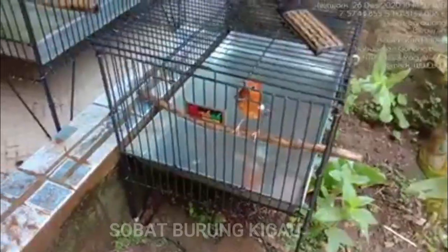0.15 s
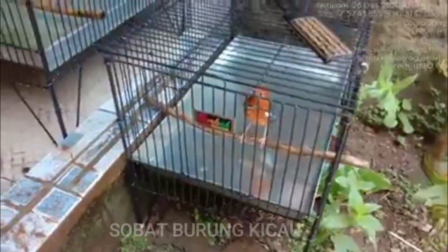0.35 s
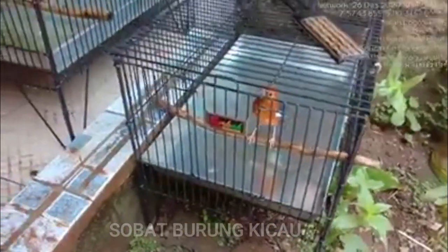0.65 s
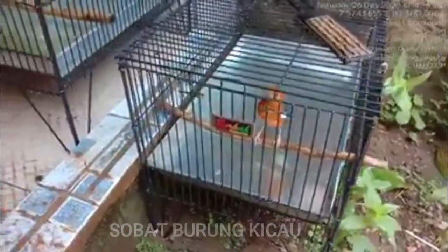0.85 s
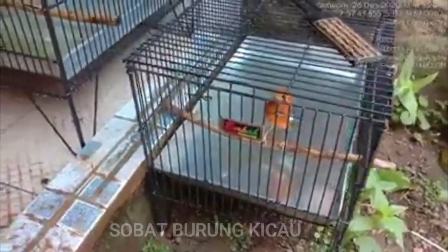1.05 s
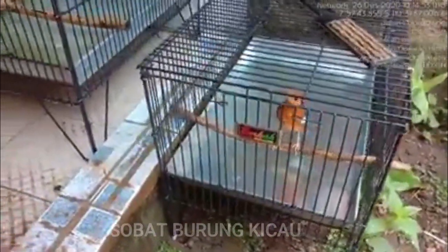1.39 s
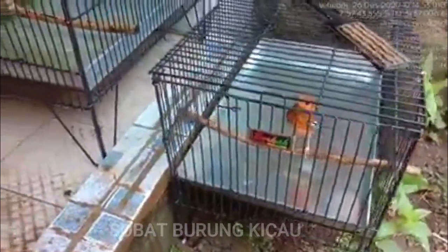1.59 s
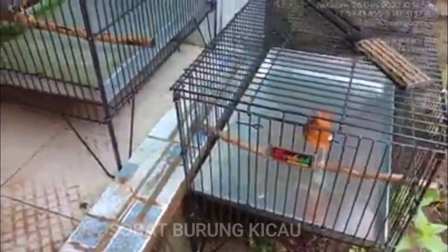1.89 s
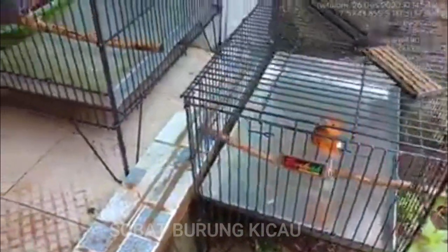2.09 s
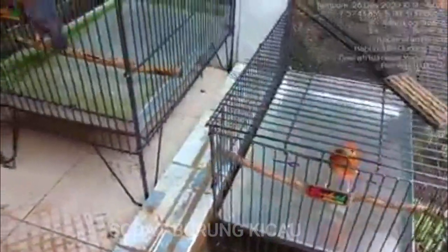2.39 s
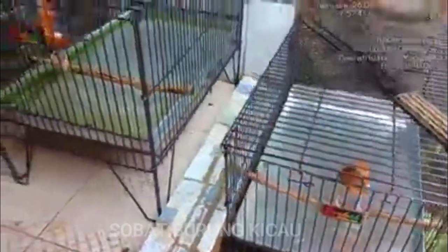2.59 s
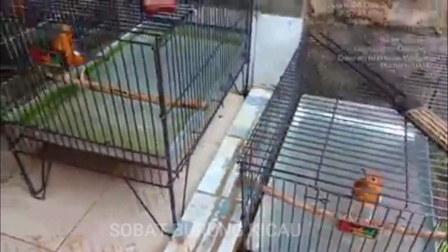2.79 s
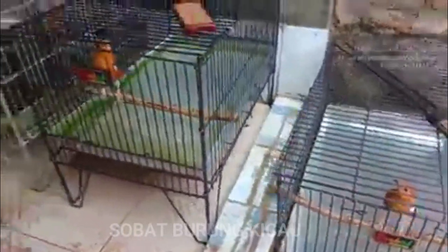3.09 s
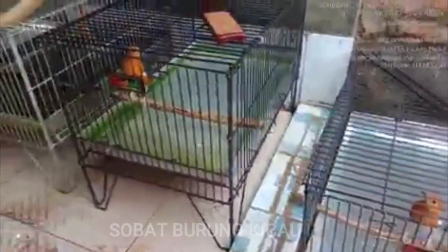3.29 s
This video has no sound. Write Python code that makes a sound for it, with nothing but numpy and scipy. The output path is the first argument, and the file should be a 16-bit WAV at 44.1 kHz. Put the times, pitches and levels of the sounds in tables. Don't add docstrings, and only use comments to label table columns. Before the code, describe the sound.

A caged songbird close to the microphone fires a quick run of five harsh high chirps, then one softer falling whistle; fainter birds whistle lower from farther off in a ringing tiled yard over low traffic rumble.

```python
import sys
import numpy as np
from scipy import signal
from scipy.fft import rfft, irfft
from scipy.io import wavfile
from scipy.ndimage import uniform_filter1d

SR = 44100
rng = np.random.default_rng(int(sys.argv[2]) if len(sys.argv) > 2 else 0)


def dump_mix(stems):
    frames = np.atleast_2d(stems).T
    limited = np.clip(frames, -1, 1)
    pcm = np.round(limited * 32767).astype(np.int16)
    wavfile.write(sys.argv[1], SR, pcm)


def linear_from_db(decibels):
    return 10 ** (np.asarray(decibels, float) / 20)


N = 152145

# pitch_hz [Hz], density_db [dB per Hz]
RUMBLE_SPECTRUM = [(20, -37), (45, -1), (92, -2), (174, -7.5), (270, -7.5), (495, -13.5), (1000, -27.5),
                   (1600, -33.5)]
# start_s [s], level_db [dB]
BACKGROUND_SWELL = [(0, -53.5), (.2, -54), (.8, -60), (1.25, -61.5), (1.4, -59), (1.75, -52), (3.45, -50)]
# pitch_hz [Hz], share [0-1]
SWELL_SHARE = [(60, 0.71), (250, 0.76), (700, 0.92), (1600, 0.7), (5000, 0.55), (12000, 0.5)]
# pitch_hz [Hz], width_hz [Hz], level_db [dB]
MOTOR_HUM = [(59.4, 18, -51.5), (96.5, 40, -53.5), (199, 17, -62), (235, 16, -68.5)]
# pitch_hz [Hz], density_db [dB per Hz]
HISS_SPECTRUM = [(1200, -8), (1900, -4), (2500, -2), (4000, -6.5), (7000, -7.5), (9500, -8.5),
                 (12000, -4.5), (14500, -8.5)]
# pitch_hz [Hz], likeness [0-1]
LIKENESS = [(30, 1), (150, 0.96), (400, 0.9), (800, 0.66), (3000, 0.15), (12000, 0.12)]
RUMBLE_DB, HISS_DB = -47, -70.5

# start_s [s], pitch_hz [Hz], level_db [dB]
CHIRPS_UPPER = [
    [(.157, 4367, -55), (.176, 4950, -30), (.2, 4550, -41), (.225, 4400, -40), (.25, 4220, -43.5),
     (.28, 4450, -42), (.302, 4900, -38), (.32, 4750, -44), (.352, 4720, -42)],
    [(.397, 5400, -52), (.41, 5330, -41), (.427, 5150, -33), (.445, 4950, -40.5), (.475, 4550, -45)],
    [(.535, 5250, -50), (.552, 5430, -29.5), (.578, 5480, -31), (.59, 5440, -53), (.6, 5450, -45),
     (.61, 5450, -52), (.62, 5450, -31), (.635, 5450, -41)],
    [(.66, 5100, -51), (.684, 5350, -37.5), (.695, 5330, -46), (.705, 5320, -42.5), (.725, 5300, -48.5),
     (.76, 5280, -51.5)],
]
# start_s [s], pitch_hz [Hz], level_db [dB]
HELD_NOTES = [
    [(.884, 3970, -50), (.902, 5853, -33.5), (.93, 5670, -42), (1, 5684, -39), (1.06, 5650, -40.5),
     (1.085, 5550, -52.5), (1.13, 5600, -59)],
    [(1.318, 3760, -64), (1.337, 3346, -48), (1.355, 3088, -46), (1.385, 2940, -42), (1.41, 2770, -48.5),
     (1.428, 2595, -43), (1.49, 2504, -46.5), (1.65, 2609, -43.5), (1.725, 2433, -45.5)],
]
# start_s [s], pitch_hz [Hz], level_db [dB]
CHIRPS_LOWER = [
    [(.156, 1950, -52), (.168, 2750, -45), (.19, 2660, -44), (.225, 2657, -58.5), (.255, 2700, -68),
     (.28, 2950, -53), (.3, 3290, -47), (.325, 3406, -53.5), (.35, 3650, -56)],
    [(.398, 3300, -56), (.415, 3800, -54), (.46, 4150, -62)],
    [(.535, 2590, -49), (.55, 3314, -59), (.585, 4100, -79)],
    [(.66, 3900, -63), (.69, 3960, -64), (.725, 3830, -91)],
    [(.884, 2793, -62.5), (.905, 4180, -54.5), (.93, 4260, -78)],
]
# upper_multiple [ratio], lower_multiple [ratio],
# level_db [dB to the lower voice]
MIXED_TONES = [(0, 1, 5), (0, 2, 5), (1, -1, -17.5), (1, 1, -1.5), (1, 2, -3.5), (2, -1, -8), (2, 1, -5),
               (2, 2, -10)]
NEAR_WOBBLE = [.007, .006, .006, .006, .009, .006]
# second_db [dB], third_db [dB], air_db [dB], puff_db [dB], left_right_db [dB]
NOTE_COLOUR = [
    (-6.5, 3.5, -35.5, -63, 2),
    (-14, -15, -47.5, -29.5, 1),
    (-10.5, -18, -51, -29, 0),
    (-3.5, -14, -46, -43, -1),
    (-6, -38, -90, -37.5, 0),
    (-41, -46, -63.5, -46.5, 0.3),
]
# pitch_hz [Hz], density_db [dB per Hz]
BREATH_SPECTRUM = [(1500, -31), (2200, -20), (3700, -15), (5200, -8), (7200, -16), (9500, -8),
                   (12500, -2.5), (14500, -4.5)]
# start_s [s], pitch_hz [Hz], level_db [dB]
WHISTLE_RASP = [(1.318, 5400, -64), (1.336, 4900, -51), (1.36, 4700, -57), (1.41, 4500, -66)]
# multiple [ratio], level_db [dB]
WHISTLE_PARTIALS = [(.52, -23), (.64, -24), (.8, -16), (1.13, -14)]
# pitch_hz [Hz], t60_s [s]
WALL_DECAY = [(1500, 0.74), (3000, 0.58), (6000, 0.47), (10000, 0.45), (14000, 0.29)]
EARLY_DB = -3.5

# start_s [s], length_s [s], from_hz [Hz], to_hz [Hz], level_db [dB]
FAR_TWITTER = [
    (0.735, 0.046, 2980, 2840, -63),
    (2.403, 0.073, 4600, 5900, -68.5),
    (2.52, .08, 5300, 6090, -66),
    (2.621, 0.084, 5600, 4350, -74.5),
    (3.046, 0.068, 10800, 11650, -69),
]
# start_s [s], pitch_hz [Hz], level_db [dB]
FAR_FIRST = [
    [(.82, 2416, -71.5), (.9, 2548, -68), (1.04, 2480, -71), (1.08, 2380, -69), (1.17, 2560, -68),
     (1.26, 2090, -70), (1.32, 2004, -62.5), (1.37, 1740, -60), (1.4, 1700, -69)],
    [(1.825, 2050, -63), (1.86, 2250, -63), (1.885, 2634, -59), (1.93, 2660, -60), (1.965, 2720, -67)],
    [(1.968, 3460, -64), (1.99, 3100, -64), (2.01, 2910, -55), (2.05, 2907, -52.5), (2.1, 2698, -55.5),
     (2.15, 2746, -55.5), (2.2, 2870, -48), (2.235, 2950, -50), (2.29, 2955, -68)],
    [(2.305, 3900, -77), (2.335, 3950, -61), (2.37, 3900, -61), (2.42, 3850, -65)],
]
# start_s [s], pitch_hz [Hz], level_db [dB]
FAR_LAST = [
    [(2.455, 2920, -63), (2.48, 3430, -64), (2.515, 2706, -61)],
    [(2.522, 2843, -54), (2.56, 2796, -56), (2.605, 2700, -53), (2.625, 2750, -66), (2.645, 2842, -52),
     (2.68, 2825, -53), (2.74, 2860, -70)],
    [(2.885, 2205, -67), (2.95, 2073, -61.5), (3.0, 1988, -62.5)],
    [(3.01, 2330, -62), (3.05, 2506, -59.5), (3.08, 2940, -53.5), (3.11, 3148, -58), (3.15, 3205, -65)],
    [(3.23, 2237, -62), (3.26, 2233, -60), (3.29, 2110, -65), (3.325, 1994, -63), (3.35, 1910, -68)],
]
# start_s [s], pitch_hz [Hz], level_db [dB]
FAR_HOARSE = [
    [(1.966, 3200, -67), (1.99, 3200, -62), (2.06, 3200, -66), (2.14, 3050, -74)],
    [(2.45, 3100, -72), (2.48, 3100, -66), (2.53, 3100, -72)],
]
# start_s [s], pitch_hz [Hz], level_db [dB]
ENGINE_DRONE = [(1.5, 215, -67), (1.8, 220, -62), (2.2, 220, -62.5), (2.45, 220, -71), (2.65, 220, -55),
                (2.9, 235, -59.5), (3.1, 256, -55.5), (3.3, 259.8, -63), (3.45, 261, -65)]


def evened(x):
    return x / np.sqrt(np.mean(x ** 2) + 1e-20)


def read(points, hz):
    f, value = np.transpose(points)
    return np.interp(np.log(hz + 1), np.log(f + 1), value)


def add(mix, start_s, sound):
    part = mix[..., round(start_s * SR):][..., :sound.shape[-1]]
    part += sound[..., :part.shape[-1]]


def drift(count, smooth_s):
    size = max(int(smooth_s * SR), 1)
    once = uniform_filter1d(rng.standard_normal(count), size)
    return evened(uniform_filter1d(once, size))


def background():
    frames, hz = N // 512 + 5, np.fft.rfftfreq(2048, 1 / SR)
    a, b, c, d, patches = rng.standard_normal((frames, 1025, 5)).T
    patches = evened(uniform_filter1d(uniform_filter1d(patches, 10, 0), 6, 1))

    s, level_db = np.transpose(BACKGROUND_SWELL)
    swing_db = np.interp(np.arange(frames) * 512 / SR, s, level_db) - level_db.max()
    beyond_octaves = np.log2(np.maximum(hz / RUMBLE_SPECTRUM[-1][0], 1))
    rumble = linear_from_db(read(RUMBLE_SPECTRUM, hz) - 20 * beyond_octaves)
    hiss = linear_from_db(read(HISS_SPECTRUM, hz))
    power = (rumble / np.linalg.norm(rumble) * linear_from_db(RUMBLE_DB))[:, None] ** 2
    power = power + (hiss / np.linalg.norm(hiss) * linear_from_db(HISS_DB))[:, None] ** 2
    power = power * linear_from_db(2 * read(SWELL_SHARE, hz)[:, None] * swing_db)
    for pitch_hz, width_hz, hum_db in MOTOR_HUM:
        peak = np.exp(-((hz - pitch_hz) / max(width_hz, 8)) ** 2)
        power = power + (peak / peak.sum() * linear_from_db(2 * hum_db))[:, None]

    same = np.clip(read(LIKENESS, hz), -1, 1)[:, None]
    left = a + 1j * b
    right = same * left + np.sqrt(1 - same ** 2) * (c + 1j * d)
    z = np.array([left, right]) * linear_from_db(1.03 * patches)
    unit = np.std(signal.istft(z[0], nperseg=2048, noverlap=1536)[1]) / np.sqrt(len(hz))
    return signal.istft(z * np.sqrt(power), nperseg=2048, noverlap=1536)[1][:, :N] / unit


def voice(curve, t, wobble):
    s, pitch_hz, level_db = np.transpose(curve)
    pitch = np.interp(t, s, pitch_hz)
    glide = abs(np.gradient(np.log2(pitch))) * SR
    wobble = wobble + np.minimum(0.0022 * glide, 0.06)
    turns = np.cumsum(pitch * (1 + wobble * drift(len(t), 0.00234))) / SR
    edges = np.clip(np.minimum((t - s[0]) / 0.004, (s[-1] - t) / 0.012), 0, 1)
    flutter_db = 3.2 * drift(len(t), 0.0025)
    return turns, np.sqrt(2) * edges * linear_from_db(np.interp(t, s, level_db) + flutter_db)


def note(curve, partials, wobble, lower=None):
    t = np.arange(curve[0][0], curve[-1][0], 1 / SR)
    turns, size = voice(curve, t, wobble)
    x = size * sum(linear_from_db(db) * np.sin(2 * np.pi * k * turns) for k, db in partials)
    if lower:
        low_turns, low_size = voice(lower, t, 1.31 * wobble)
        mixed = 0
        for k, m, db in MIXED_TONES:
            mixed = mixed + linear_from_db(db) * np.sin(2 * np.pi * (k * turns + m * low_turns))
        x = x + low_size * mixed
    return t[0], x


def air(curve, air_db, puff_db):
    puff_rise_s, puff_fall_s = 0.014, 0.031
    lumps_db, lump_hz = 3.5, 240
    u = np.arange(curve[0][0], curve[-1][0], 1 / SR) - curve[0][0]
    hiss = rfft(rng.standard_normal(len(u)))
    hiss = hiss * linear_from_db(read(BREATH_SPECTRUM, np.fft.rfftfreq(len(u), 1 / SR)))
    hiss = hiss * linear_from_db(lumps_db * drift(len(hiss), lump_hz * u[-1] / SR))
    shape = linear_from_db(air_db) + linear_from_db(puff_db) * np.exp(-u / puff_fall_s)
    edges = np.clip(np.minimum(u / puff_rise_s, (u[-1] - u) / 0.025), 0, 1)
    return evened(irfft(hiss, len(u))) * shape * edges


def near_bird():
    out = np.zeros((2, N))
    notes = zip(CHIRPS_UPPER + HELD_NOTES, CHIRPS_LOWER + [None], NEAR_WOBBLE, NOTE_COLOUR)
    for curve, lower, wobble, colour in notes:
        second_db, third_db, air_db, puff_db, left_right_db = colour
        start_s, x = note(curve, [(1, 0.0022), (2, second_db), (3, third_db)], wobble, lower)
        pan = linear_from_db(np.array([[0.5], [-0.5]]) * left_right_db)
        add(out, start_s, (x + air(curve, air_db, puff_db)) * pan)
    whistle = HELD_NOTES[-1]
    add(out, *note(WHISTLE_RASP, [(1, 1), (1.45, -11.5)], 0.14))
    add(out, *note(whistle, WHISTLE_PARTIALS, 0.034))
    add(out, *note(whistle, [(4, -27.5), (5, -22.0)], 0.05))
    return out


def yard(x, wet_db):
    taps = np.zeros((2, SR))
    at = np.arange(400, SR - 20, 20) + rng.integers(0, 20, (2, (SR - 401) // 20))
    np.put_along_axis(taps, at, rng.choice([-1., 1.], at.shape), 1)
    hz, t, z = signal.stft(taps, SR, nperseg=256)
    t60_s = np.maximum(read(WALL_DECAY, hz), 0.1)[:, None]
    tail = signal.istft(z * linear_from_db(-60 * t / t60_s), SR, nperseg=256)[1]
    tail = linear_from_db(wet_db) * tail / np.linalg.norm(tail[0])

    early = np.zeros_like(tail)
    bounce_at = rng.integers(40, 900, (2, 6))
    bounces = rng.choice([-1., 1.], (2, 6)) * linear_from_db(EARLY_DB) / np.sqrt(6)
    np.put_along_axis(early, bounce_at, bounces, 1)
    wet = signal.fftconvolve(x, tail + early, axes=1)[:, :N]
    return (x + wet) / np.sqrt(1 + linear_from_db(2 * wet_db) + linear_from_db(2 * EARLY_DB))


def far_birds():
    out = np.zeros(N)
    for start_s, length_s, from_hz, to_hz, level_db in FAR_TWITTER:
        bend_hz = 0.7 * from_hz + 0.3 * to_hz
        curve = [(start_s, from_hz, level_db - 7),
                 (start_s + 0.3 * length_s, bend_hz, level_db),
                 (start_s + length_s, to_hz, level_db)]
        add(out, *note(curve, [(1, 0.5), (2, -9)], 0.07))
    for curve in FAR_FIRST + FAR_LAST:
        add(out, *note(curve, [(1, 1), (4, -24)], 0.004))
    for curve in FAR_HOARSE:
        add(out, *note(curve, [(1, 0)], 0.09))
    rustle_span = [(2.3,), (2.4,)]
    add(out, rustle_span[0][0], air(rustle_span, air_db=-69, puff_db=-63))
    return out * linear_from_db(np.array([[1.], [-1.]]))


def passing_engine():
    out = np.zeros((2, N))
    add(out, *note(ENGINE_DRONE, [(1, 0), (1.5, -7.5)], 0.0303))
    return out


def scene():
    traffic = background()
    near = yard(near_bird(), wet_db=-7.5)
    far = yard(far_birds(), wet_db=-3.5)
    return traffic + near + far + passing_engine()


def top_cut(x):
    return signal.sosfilt(signal.butter(12, 14380, fs=SR, output="sos"), x)


def record(dry):
    low_pass = signal.firwin(511, 14250, window=("kaiser", 9), fs=SR)
    mix = signal.oaconvolve(dry, low_pass[None], "same")
    return top_cut(mix)


dry = scene()
out = record(dry)
dump_mix(out)
```